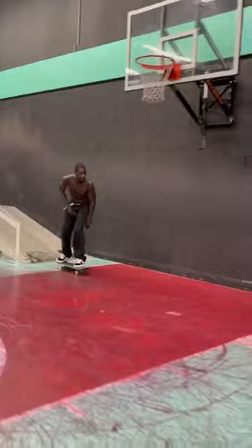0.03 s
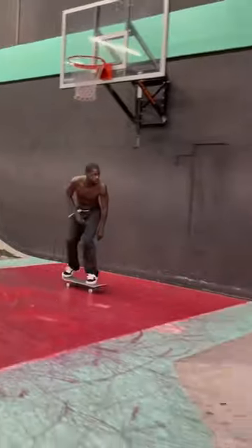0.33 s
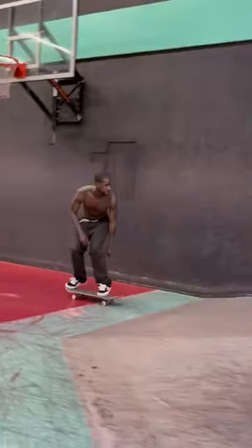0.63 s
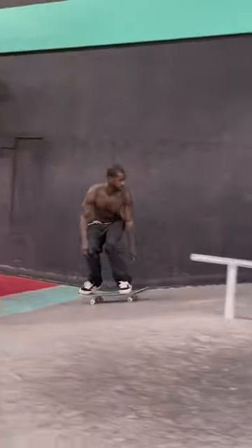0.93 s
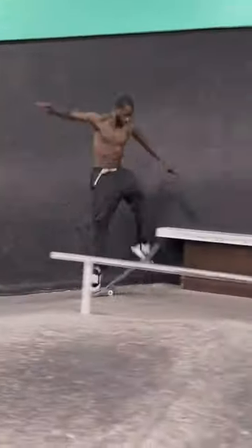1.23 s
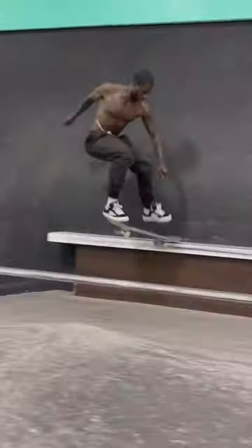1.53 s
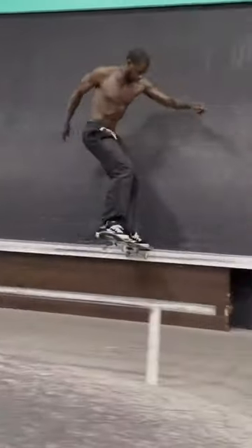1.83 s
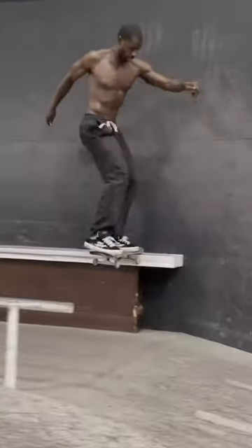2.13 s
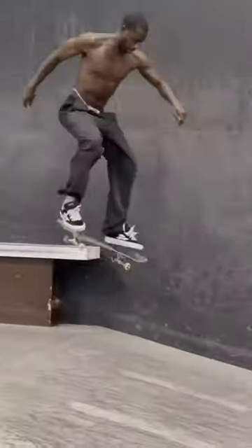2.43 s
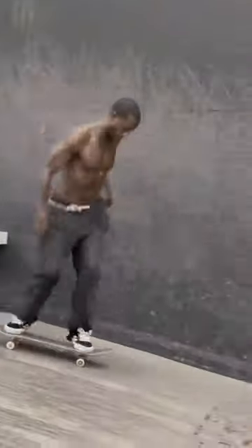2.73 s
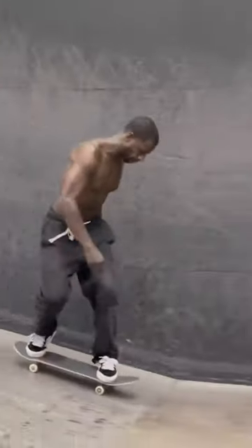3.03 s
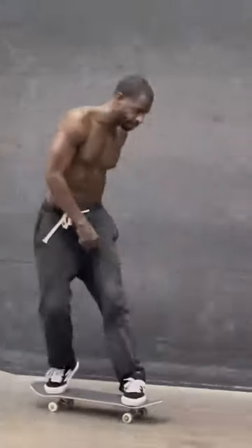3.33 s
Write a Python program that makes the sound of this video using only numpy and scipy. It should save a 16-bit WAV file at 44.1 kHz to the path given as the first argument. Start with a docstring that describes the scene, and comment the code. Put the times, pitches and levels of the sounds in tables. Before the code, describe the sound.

A skateboard rolls through a big echoing hall, snaps over a seam and clatters through a flip. It booms onto a hollow ledge, scrapes along, slams down and rolls away, over ventilation hum and dull microphone thumps.

```python
"""Ventilation hums in a big reverberant hall as a skateboard rolls along, its wheels excited by the
floor's roughness; a hand-held camera carried after it adds dull thumps. At 0.6 s the wheels snap over
a seam, and at 1.15 s the rider pops a flip, the impacts ringing the deck. Near 1.5 s the board lands
on a hollow ledge, which booms, then slides along it with a groan and hiss of friction. At 2.56 s it
slams down on the floor and rolls away."""
import sys
import numpy as np
from scipy import signal
from scipy.fft import rfft, irfft, next_fast_len
from scipy.io import wavfile
from scipy.ndimage import map_coordinates

SR = 44100
rng = np.random.default_rng(int(sys.argv[2]) if len(sys.argv) > 2 else 0)


def wrap_up_sound(samples):
    """Save the sound to the file named by the first command line argument, as 16-bit audio."""
    columns = np.atleast_2d(samples).T
    # keep every value between -1 and 1, then stretch to whole-number steps
    tamed = np.clip(columns, -1, 1)
    steps = np.round(tamed * 32767).astype(np.int16)
    wavfile.write(sys.argv[1], SR, steps)


N = 158760

# spectrum of the ventilation's air flow (frequency [Hz], level [dB])
AIR_SPECTRUM = [(40, -10.5), (150, -0.5), (300, -8), (1000, -8.5), (1700, -1.5), (2700, -13.5), (4300, -16),
                (6000, -17), (9000, -31.5)]
# tones of the fans (frequency [Hz], level [dB])
FAN_TONES = [(398.4, -38.5), (656.8, -43)]

# envelopes of rolling on paint, on concrete and after the landing (time [s], level [dB])
PAINT_ENVELOPE = [(0, -26.5), (.62, -26), (.7, -58)]
CONCRETE_ENVELOPE = [(.6, -69), (.64, -18), (.8, -25), (1.12, -25), (1.28, -50)]
RUNOUT_ENVELOPE = [(2.55, -64), (2.6, -23), (2.75, -25), (2.88, -22.5), (3.1, -25), (3.25, -30.5),
                   (3.6, -36.5)]
# spectra of rolling on the same three stretches (frequency [Hz], level [dB])
PAINT_SPECTRUM = [(60, -23.5), (150, 0), (280, -14), (420, -0.5), (650, 2.5), (1050, -11), (1600, -9.5),
                  (2500, -23), (5500, -19), (9000, -32.5)]
CONCRETE_SPECTRUM = [(50, -1.5), (150, 1.5), (290, -9.5), (410, -2), (620, -3.5), (950, -17.5),
                     (1300, -9.5), (2500, -24.5), (5600, -18.5), (9000, -28.5)]
RUNOUT_SPECTRUM = [(60, -10), (140, -2.5), (190, 5), (320, -17), (500, -0.5), (1100, -7), (1900, -5.5),
                   (3200, -31), (6000, -37), (9000, -22.5)]
# resonances of the deck under the rider's load (frequency [Hz], bandwidth [Hz], level [dB])
LOADED_DECK_RESONANCES = [(190.4, 57, 8.5), (534, 48, 6), (851, 16.5, 7), (1527, 230, 1.5)]

# handling thumps (time [s], relative level [dB], starting frequency [Hz])
THUMPS = [(0.047, -18.5, 160), (1.056, -14.5, 158), (1.078, -17, 161), (1.097, -12.5, 97),
          (1.324, -19, 129), (2.282, -15, 127), (2.458, -13.5, 128), (3.313, -14.5, 217)]
# envelope of the handling rumble (time [s], level [dB])
RUMBLE_ENVELOPE = [(0, -28.5), (.58, -52.5), (.66, -31), (1.15, -29), (1.5, -31), (2.0, -32.5), (2.5, -26),
                   (2.7, -38), (3.3, -30), (3.6, -56)]
# spectrum of that rumble (frequency [Hz], level [dB])
RUMBLE_SPECTRUM = [(25, -11), (40, -22), (55, 0.5), (90, -6), (150, -30.5), (300, -23), (1000, -79.5)]

# wheels crossing floor seams (time [s], level [dB])
SEAM_CROSSINGS = [(0.6153, -4), (0.6217, -9.5), (.690, -4.5), (.696, -17), (2.885, -19), (2.987, -16)]
# impacts of tail, wheels and trucks
# (time [s], level [dB], tilt [dB/octave], t60 [s], relative reverberation level [dB])
CLACKS = [(.647, -17, -3.5, 0.054, -18), (1.143, -12, -3.5, 0.048, -19), (1.1469, -7.5, 0, 0.024, -9),
          (1.161, -12, -0.5, 0.1, -5), (1.1811, -2, 2, 0.018, -2.5), (1.198, -9.5, 0.5, 0.026, -1),
          (1.2049, -10, 1, 0.031, -5), (1.431, -8, -1.5, 0.051, -3), (1.453, -12, -2, 0.11, -7.5),
          (1.489, -6.5, -3.5, 0.042, -10.5), (1.507, -16, -2, 0.1, -7.5), (1.594, -11, -3, 0.057, -3),
          (1.708, -9.5, -4, 0.035, -13), (1.726, -16.5, 0, 0.083, -3.5), (1.749, -10, 1.5, 0.062, -1.5),
          (1.832, -15.5, 2, 0.035, -7), (2.99, -19, 2, 0.056, -7)]
# spectrum of a clack before its tilt (frequency [Hz], level [dB])
CLACK_SPECTRUM = [(350, -3), (1300, 0.5), (2300, 0.5), (4000, -3.5), (8000, -12.5)]
# modes of the struck deck (frequency [Hz], level [dB], t60 [s])
DECK_MODES = [(175, 2.5, 0.15), (540, -8, 0.1), (886, -11, 0.16), (1115, -8, 0.069), (1510, -10, 0.087),
              (2023, -5, 0.08), (3430, -7.5, 0.044)]
# hollow knocks of the board on the floor (time [s], level [dB], frequency [Hz])
KNOCKS = [(.647, -13, 542), (.720, -3.5, 598), (1.169, -12.5, 1327), (1.183, -14, 720), (2.584, -3, 556),
          (2.988, -8.5, 442), (3.082, -11.5, 535), (3.104, -11, 554)]

# modes of the hollow ledge, struck in turn (time [s], level [dB], frequency [Hz], t60 [s])
BOOMS = [(1.493, 1, 167.4, 0.13), (1.505, -4.5, 89.4, 0.19), (1.539, -5.5, 60.3, 0.25),
         (1.565, -8, 136.4, 0.18)]
# envelope of the boom's noisy tail (time [s], level [dB])
BOOM_ENVELOPE = [(1.42, -32.5), (1.48, -21), (1.51, -15.5), (1.6, -21), (1.7, -19.5), (1.85, -26.5),
                 (2, -65)]
# spectrum of that tail (frequency [Hz], level [dB])
BOOM_SPECTRUM = [(35, -14), (64, -4.5), (200, -7.5), (430, -8.5), (1200, -27), (4000, -57.5)]
# envelopes of the slide's scrape, groan and hiss (time [s], level [dB])
SCRAPE_ENVELOPE = [(1.7, -33), (1.72, -14), (1.76, -18), (1.83, -17.5), (1.92, -20.5), (2.1, -26),
                   (2.33, -28), (2.45, -32)]
GROAN_ENVELOPE = [(1.73, -41.5), (1.77, -17.5), (1.83, -20.5), (1.87, -29), (1.905, -16.5), (1.97, -28.5),
                  (2.1, -45.5)]
HISS_ENVELOPE = [(1.7, -47.5), (1.75, -37.5), (1.9, -30.5), (2.1, -48), (2.3, -36.5), (2.52, -58.5)]
# spectra of the scrape and the hiss (frequency [Hz], level [dB])
SCRAPE_SPECTRUM = [(40, -24), (140, -1), (330, -17), (720, -2.5), (1000, -8.5), (1500, -6.5), (2100, -22),
                   (4500, -28), (6000, -23.5), (9000, -33)]
HISS_SPECTRUM = [(1200, -15), (2300, -1), (3300, 8), (4300, -7), (6500, 0.5), (9000, -22)]
# resonances of the rubbed ledge (frequency [Hz], bandwidth [Hz], level [dB])
LEDGE_RESONANCES = [(151, 87, -2.5), (667, 55, 6), (1410, 37, -13), (2405, 90, -4.5), (3110, 72, -6.5)]

# wheel impacts of the landing (time [s], level [dB])
LANDING_IMPACTS = [(2.556, -7.5), (2.559, -6), (2.5658, -8), (2.576, -8.5), (2.588, -13)]
# spectrum of each such impact (frequency [Hz], level [dB])
LANDING_SPECTRUM = [(70, -27), (190, 1), (350, -8.5), (800, -6), (1400, -5.5), (2400, -17.5), (3400, -20),
                    (4200, -28.5), (9000, -28)]

# reverberation time of the hall (frequency [Hz], t60 [s])
HALL_T60 = [(100, 0.63), (500, 1.16), (2500, 2.13), (8000, 1.26)]
# mid gain, notched where left and right fall out of phase (frequency [Hz], gain [dB])
MID_GAIN = [(4550, 1), (4850, -17.5), (5150, 2.5), (8200, 1), (8800, -21)]
# side gain, which sets the stereo width (frequency [Hz], gain [dB])
SIDE_GAIN = [(60, -14), (120, -9), (220, -7.5), (600, -4), (1150, 2), (1500, -5.5), (2000, -26),
             (3300, -8.5), (4800, 3), (6000, -14.5), (8000, 5.5)]
# further side gain of the bass, which narrows as the board comes close (time [s], gain [dB])
BASS_WIDTH = [(1.35, 7), (1.55, 0.5), (2.55, -40), (2.7, -8)]
# stereo balance (frequency [Hz], left minus right level [dB])
BALANCE = [(200, 0.5), (600, 2.5), (1050, 2.5), (2200, 0.5)]
# microphone response ahead of its treble cutoff (frequency [Hz], gain [dB])
MIC_RESPONSE = [(22, -2), (45, -0.5), (9300, -1), (10200, 4)]


def amp(db):
    """Amplitude ratio of a level in decibels."""
    return 10 ** (np.asarray(db) / 20)


def along(points, hz):
    """Interpolation of (frequency, value) points on a logarithmic frequency axis."""
    freqs, values = np.transpose(points)
    return np.interp(np.log(hz + 1), np.log(freqs + 1), values)


def envelope(rows):
    """Gain per sample, interpolated in decibels between (time, level) rows."""
    times, db = np.transpose(rows)
    return amp(np.interp(np.arange(N) / SR, times, db))


def unit(x):
    """Normalisation to rms 1."""
    return x / np.sqrt(np.mean(x ** 2) + 1e-20)


def wobble(rate):
    """Smooth random modulation: a spline through rate Gaussian knots a second."""
    return map_coordinates(rng.standard_normal(int(N * rate / SR) + 4), [np.arange(N) * rate / SR])


def filtered(x, response):
    """Linear filtering: the spectrum of x is multiplied by a frequency response."""
    size = x.shape[-1]
    padded = next_fast_len(size + SR // 10)
    return irfft(rfft(x, padded) * response(np.fft.rfftfreq(padded, 1 / SR)), padded)[..., :size]


def coloured(x, spectrum, tilt_db=0):
    """Spectral shaping with a tilt per octave and a second-order roll-off below the lowest point."""
    roll_off = lambda hz: np.minimum(hz / spectrum[0][0], 1) ** 2
    return filtered(x, lambda hz: amp(along(spectrum, hz) + tilt_db * np.log2(hz + 1)) * roll_off(hz))


def noise(spectrum, size=N, tilt_db=0):
    """Coloured Gaussian noise of rms 1, uncorrelated between mid and side."""
    return unit(coloured(rng.standard_normal((2, size)), spectrum, tilt_db))


def add(track, start_s, sound):
    """Superposition of a sound on a track from start_s onward."""
    part = track[..., round(start_s * SR):][..., :sound.shape[-1]]
    part += sound[..., :part.shape[-1]]


def strike(t, attack_s, t60):
    """Envelope of a damped vibration: a quick rise and an exponential decay of 60 dB in t60."""
    return (1 - np.exp(-t / attack_s)) * amp(-60 * t / t60)


def mode(t, hz, attack_s, t60):
    """Free vibration of one mode: a damped sinusoid."""
    return strike(t, attack_s, t60) * np.sin(2 * np.pi * hz * t)


def centred(x):
    """A source in phase in both channels: all mid, no side."""
    return np.array([x, np.zeros_like(x)])


def hall_response():
    """Impulse response of a diffuse field: fresh noise, each frequency decaying at its own rate."""
    hz, t, bands = signal.stft(rng.standard_normal((2, SR * 3 // 2)), SR, nperseg=256)
    decay = strike(t, 0.017, along(HALL_T60, hz)[:, None])
    response = signal.istft(bands * decay, SR, nperseg=256)[1]
    return response / np.linalg.norm(response[0])


def reverberation(x):
    """Convolution of the mid signal with the hall's impulse response."""
    return signal.fftconvolve(x[:1], hall_response(), axes=1)[:, :N]


def ventilation():
    """Broadband flow noise plus fan tones, randomly modulated in level and phase."""
    t = np.arange(N) / SR
    hum = sum(amp(db + 3 * wobble(6)) * np.sqrt(2) * np.sin(2 * np.pi * hz * t + .7 * wobble(9))
              for hz, db in FAN_TONES)
    return amp(-30) * noise(AIR_SPECTRUM) + centred(hum)


def contact_noise(spectrum, resonances, ring_db, grains_per_s, grit_db, judder_db, judder_hz):
    """Forced vibration: a juddering force from roughness and single grains drives a resonant body."""
    def body(hz):
        return sum((-1) ** k * amp(db) * 1j * hz * width / (centre ** 2 - hz ** 2 + 1j * hz * width)
                   for k, (centre, width, db) in enumerate(resonances))

    grains = (rng.random(N) < grains_per_s / SR) * rng.standard_normal((2, N))
    roughness = rng.standard_normal((2, N)) + amp(grit_db) * unit(grains)
    force = roughness * amp(judder_db * wobble(judder_hz))
    return unit(unit(coloured(force, spectrum)) + amp(ring_db) * unit(filtered(force, body)))


def rolling():
    """Roughness excites wheels and deck on smooth paint, on bare concrete and after the landing."""
    paint = contact_noise(PAINT_SPECTRUM, LOADED_DECK_RESONANCES, ring_db=-18.5,
                          grains_per_s=720, grit_db=-4.5, judder_db=2, judder_hz=41.7)
    concrete = contact_noise(CONCRETE_SPECTRUM, LOADED_DECK_RESONANCES, ring_db=-14,
                             grains_per_s=920, grit_db=-10.5, judder_db=-1.5, judder_hz=100)
    runout = contact_noise(RUNOUT_SPECTRUM, LOADED_DECK_RESONANCES, ring_db=2,
                           grains_per_s=400, grit_db=-8, judder_db=1.4, judder_hz=40)
    return (envelope(PAINT_ENVELOPE) * paint + envelope(CONCRETE_ENVELOPE) * concrete
            + envelope(RUNOUT_ENVELOPE) * runout)


def handling_noise():
    """Structure-borne sound of the carried camera: low rumble and damped thumps of sinking pitch."""
    thumps, t = np.zeros(N), np.arange(SR // 5) / SR
    for start_s, db, hz in THUMPS:
        cycles = np.cumsum(hz / (1 + t / 0.024)) / SR  # an octave down after 24 ms
        add(thumps, start_s, amp(db + 10) * strike(t, 0.0022, t60=0.046) * np.sin(2 * np.pi * cycles))
    rumble = envelope(RUMBLE_ENVELOPE) * amp(wobble(7.6)) * noise(RUMBLE_SPECTRUM)
    return centred(thumps) + rumble


def seam_snaps():
    """A seam excites each wheel impulsively: a falling chirp and a hiss, whose treble reverberates."""
    out, t = np.zeros((2, N)), np.arange(SR // 20) / SR
    start_hz, peak_hz, peak_s, width_s = 7100, 4125, .006, 0.00082
    hz = start_hz * (peak_hz / start_hz) ** np.minimum((t / peak_s) ** 2, 3.3)
    swell = np.exp(-((t - peak_s) / width_s) ** 2) + 0.25 * strike(t, 0.00053, t60=0.044)
    chirp = centred(swell * np.sin(2 * np.pi * np.cumsum(hz) / SR))
    for start_s, db in SEAM_CROSSINGS:
        hiss = strike(t, 0.0034, t60=0.045) * noise([(900, 3.6), (4000, 7), (8000, 3.8)], len(t))
        add(out, start_s, amp(db) * (chirp + amp(-2.5) * hiss))
    treble = filtered(out, lambda f: amp(along([(3500, -22), (6000, -3)], f)))
    return out + amp(3) * reverberation(treble)


def clacks():
    """Hard impacts radiate broadband cracks and excite the deck's upper modes; reflections follow."""
    out, t = np.zeros((2, N)), np.arange(SR // 5) / SR
    reflection_delay_s = .016
    for start_s, db, tilt_db, t60, hall_db in CLACKS:
        ring = sum(amp(mode_db + rng.normal(0, 3.8)) * mode(t, hz, 0.0012, mode_t60)
                   for hz, mode_db, mode_t60 in DECK_MODES[1:])
        crack = amp(db) * strike(t, 0.00076, t60) * noise(CLACK_SPECTRUM, len(t), tilt_db)
        wash = coloured(hall_response(), CLACK_SPECTRUM, tilt_db)
        wash *= np.linalg.norm(crack[0]) / np.linalg.norm(wash[0])
        add(out, start_s, crack + amp(db - 13.5) * centred(ring))
        add(out, start_s + reflection_delay_s, amp(hall_db + 4.5) * wash)
    return out


def hollow_knocks():
    """A wheel dropping into a dip, or the tail striking the floor, excites a heavily damped resonance."""
    out, t = np.zeros((2, N)), np.arange(SR // 5) / SR
    for start_s, db, hz in KNOCKS:
        tone = centred(np.sin(2 * np.pi * hz * t))
        thud = noise([(150, 1), (700, -1), (2000, -29.5), (6000, -37)], len(t))
        add(out, start_s, amp(db) * strike(t, 0.0022, t60=0.054) * (tone + amp(-6) * thud))
    return out + amp(-4.5) * reverberation(out)


def ledge_boom():
    """The board's impact sets the hollow ledge's low modes in free vibration, with a noisy tail."""
    boom, t = np.zeros(N), np.arange(SR // 2) / SR
    for start_s, db, hz, t60 in BOOMS:
        add(boom, start_s, amp(db) * mode(t, hz, 0.0077, t60))
    return centred(boom) + envelope(BOOM_ENVELOPE) * noise(BOOM_SPECTRUM)


def ledge_slide():
    """Sliding friction drives the ledge: it scrapes and hisses, and its main resonance groans."""
    contact = contact_noise(SCRAPE_SPECTRUM, LEDGE_RESONANCES, ring_db=-7,
                            grains_per_s=500, grit_db=-1.5, judder_db=1.5, judder_hz=64)
    scrape = envelope(SCRAPE_ENVELOPE) * contact
    groan_hz = 652 * (1 + .07 * wobble(110))
    unsteady_tone = amp(5.9 * wobble(90)) * np.sin(2 * np.pi * np.cumsum(groan_hz) / SR)
    groan = centred(envelope(GROAN_ENVELOPE) * unit(unsteady_tone))
    hiss = envelope(HISS_ENVELOPE) * amp(1.8 * wobble(45)) * noise(HISS_SPECTRUM)
    return scrape + groan + hiss + amp(-9.5) * reverberation(scrape + groan)


def landing():
    """The wheels strike in quick succession; the rider's sudden load excites the deck's modes."""
    out, t = np.zeros((2, N)), np.arange(SR // 2) / SR
    for start_s, db in LANDING_IMPACTS:
        add(out, start_s, amp(db) * strike(t, 0.00054, t60=0.055) * noise(LANDING_SPECTRUM, len(t)))
    ring = sum(amp(db) * mode(t, hz, 0.0041, t60) for hz, db, t60 in DECK_MODES)
    load_s = LANDING_IMPACTS[2][0]
    add(out, load_s, amp(-5.5) * centred(ring))
    return out + amp(-13.5) * reverberation(out)


def scene():
    """Superposition of all sources in mid and side; their sum and difference give left and right."""
    mid, side = (ventilation() + rolling() + handling_noise() + seam_snaps() + clacks()
                 + hollow_knocks() + ledge_boom() + ledge_slide() + landing())
    mid = filtered(mid, lambda hz: amp(along(MID_GAIN, hz)))
    side = filtered(side, lambda hz: amp(along(SIDE_GAIN, hz)))
    side_bass = filtered(side, lambda hz: 1 / (1 + (hz / 350) ** 6))
    side += (envelope(BASS_WIDTH) - 1) * side_bass
    stereo = np.array([mid + side, mid - side])
    return filtered(stereo, lambda hz: amp(np.outer([.5, -.5], along(BALANCE, hz))))


def record(dry):
    """After a brief silence, soft saturation rounds the peaks and a steep low-pass cuts the top octave."""
    silence_s, ceiling, cutoff_hz = .037, .92, 10200
    gated = dry * (np.arange(N) > silence_s * SR)
    rounded = gated / (1 + np.abs(gated / ceiling) ** 6) ** (1 / 6)
    return filtered(rounded, lambda hz: amp(along(MIC_RESPONSE, hz)) / (1 + (hz / cutoff_hz) ** 80))


dry = scene()
out = record(dry)
wrap_up_sound(out)
```